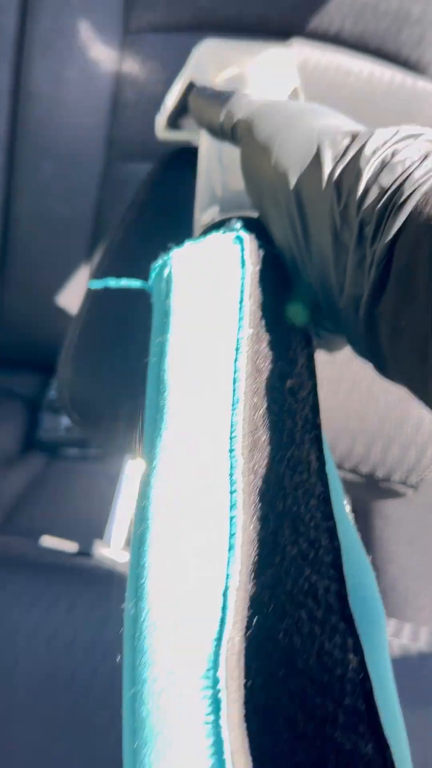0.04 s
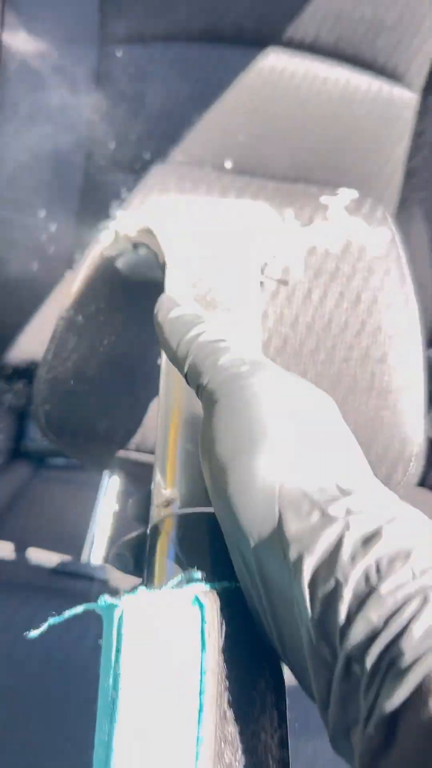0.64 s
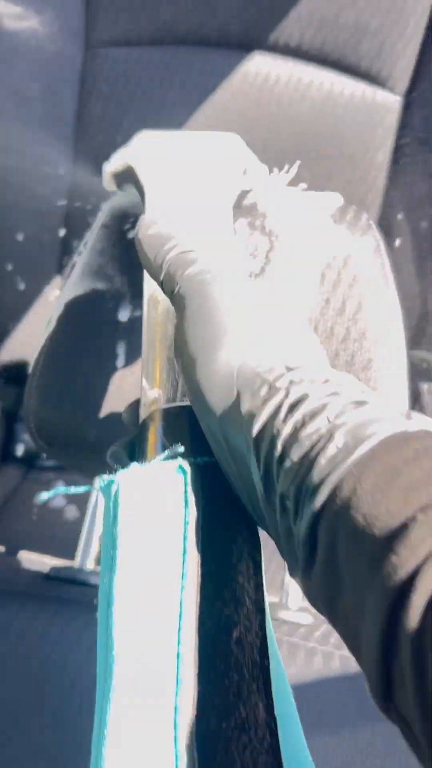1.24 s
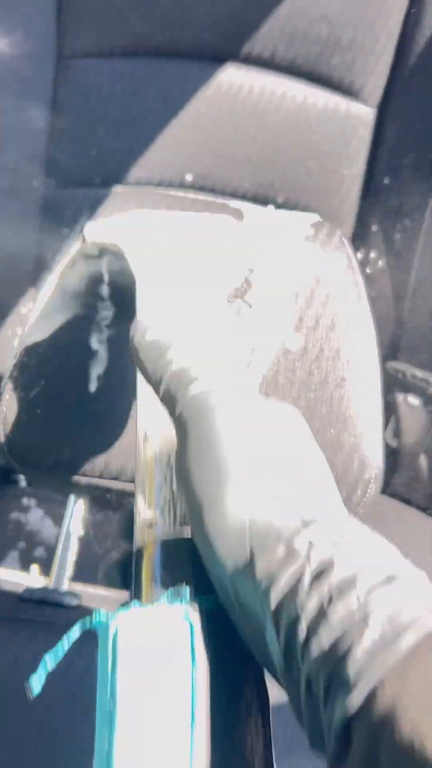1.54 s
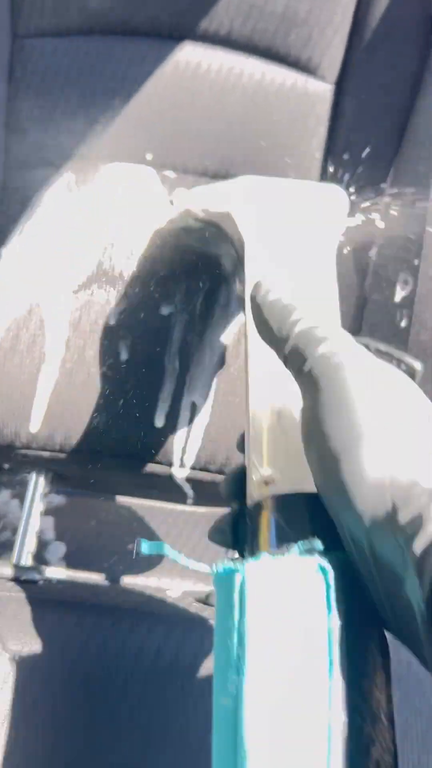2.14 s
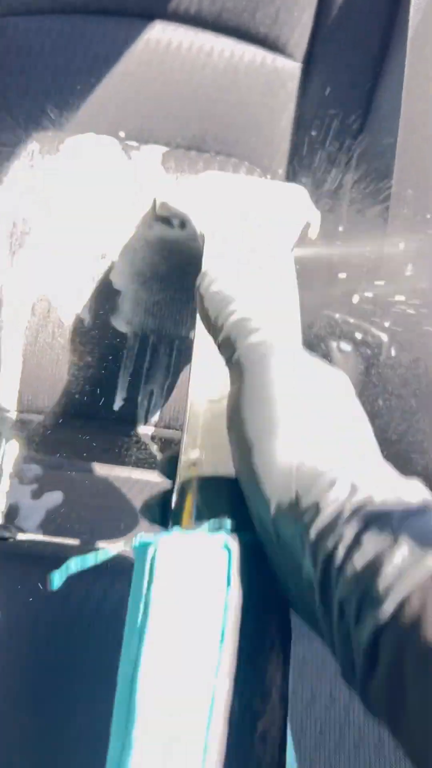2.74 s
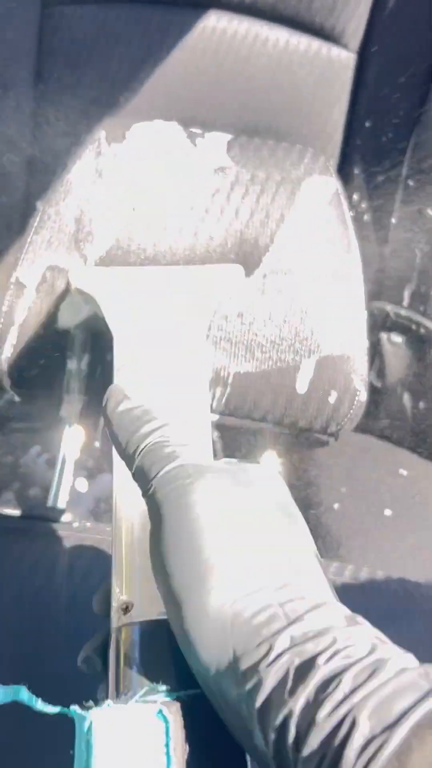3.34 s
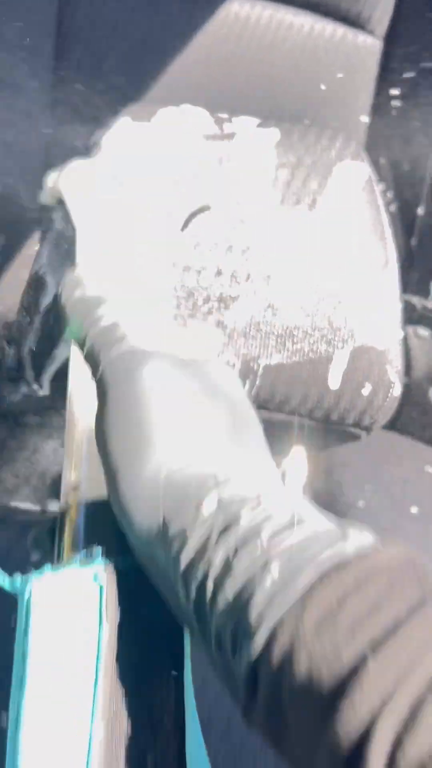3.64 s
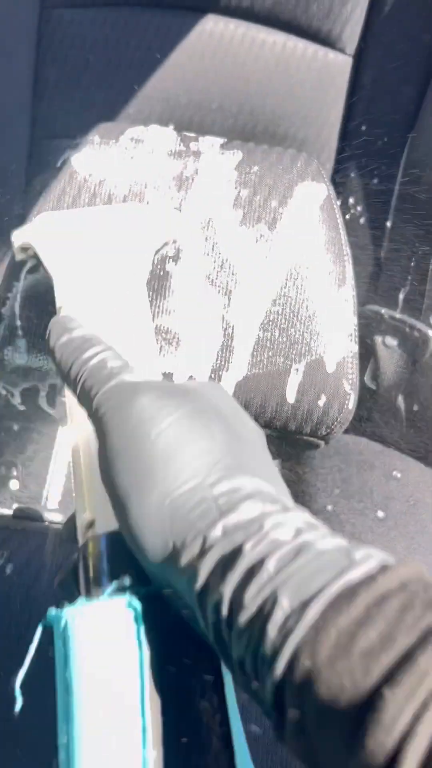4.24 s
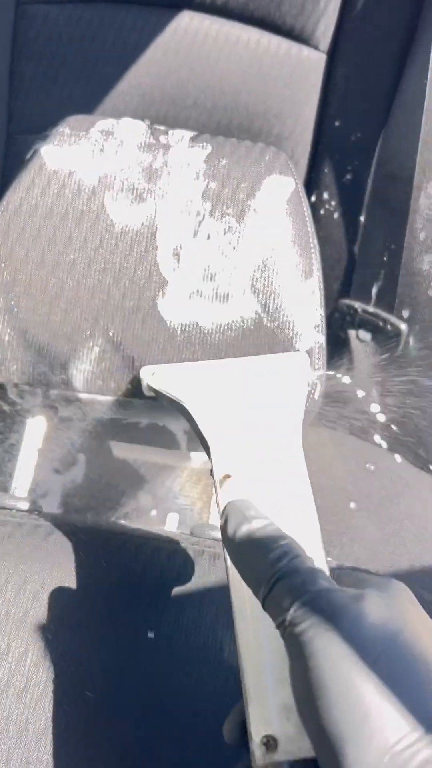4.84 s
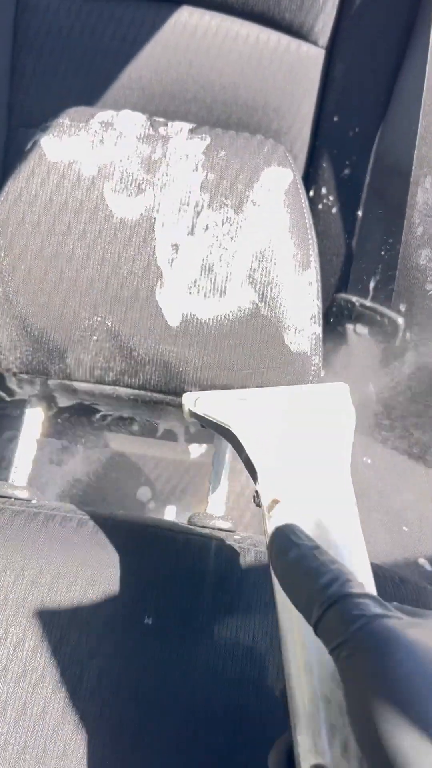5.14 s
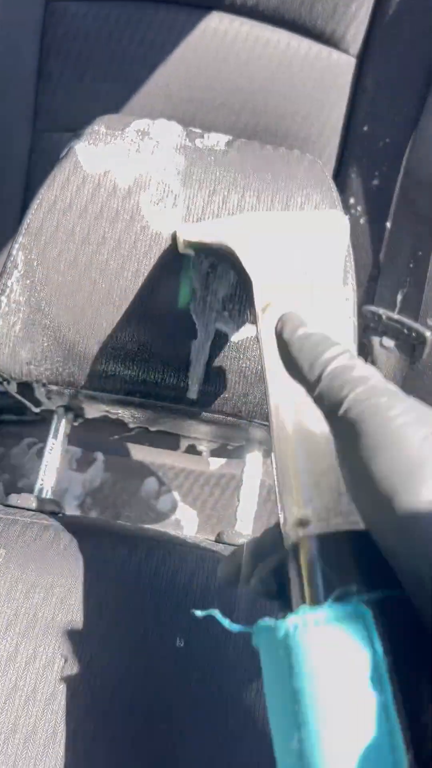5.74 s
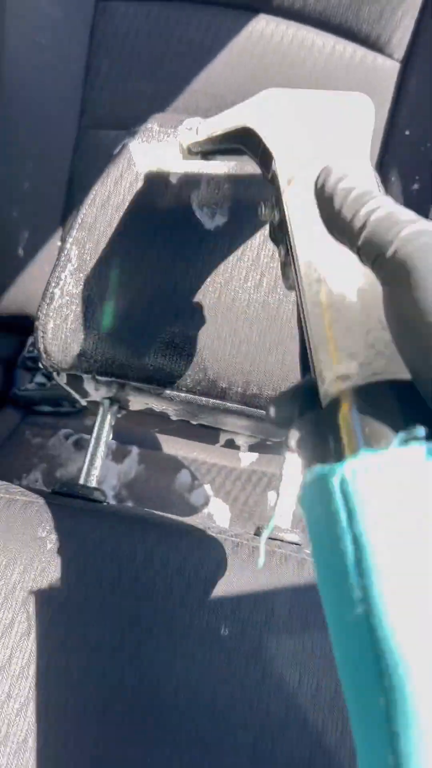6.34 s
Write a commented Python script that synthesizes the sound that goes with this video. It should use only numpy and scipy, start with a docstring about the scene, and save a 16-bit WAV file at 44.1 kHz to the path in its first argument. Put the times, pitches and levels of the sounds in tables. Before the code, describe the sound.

Close, uneven bursts of spray and suction hiss from a cleaning nozzle on wet seat fabric, over a low humming motor.

```python
"""An upholstery extractor is worked over a car seat, close by. From the start its motor hums behind
at harmonics of the shaft speed. The hand tool sprays in mostly short strokes: turbulent air hisses at
the lip, resonates in the hollow head and slurps foam from the cloth, while water spits and bumps ring
the plastic wand. Late on, the nozzle is pressed down for two long strokes, each ending in a soft thud
as it leaves the cushion."""
import sys
import numpy as np
from scipy import signal
from scipy.io import wavfile
from scipy.ndimage import uniform_filter1d

SR = 44100
rng = np.random.default_rng(int(sys.argv[2]) if len(sys.argv) > 2 else 0)


def output_pcm(signal):
    """Save a mono or channel-first signal as 16-bit PCM at the path in sys.argv[1].

    Samples are clipped to [-1, 1] before scaling.
    """
    pcm = np.clip(np.atleast_2d(signal).T, -1, 1) * 32767
    wavfile.write(sys.argv[1], SR, np.round(pcm).astype(np.int16))


N = 290619
SIZE, HOP = 1024, 256  # short-time spectrum, in samples
TIME = np.arange(N) / SR
BINS = np.fft.rfftfreq(SIZE, 1 / SR)[:, None]
FRAMES = np.arange(-(-N // HOP) + 1) * HOP / SR

# rotation of the motor shaft: t/s, f/Hz
SHAFT_SPEED = [(0.0, 28.8), (0.68, 29.3), (1.93, 29.1), (2.57, 28), (3.14, 28.8), (4.46, 28), (6.59, 29.4)]
# harmonics of the hum: multiple of the shaft speed, relative level/dB
SHAFT_ORDERS = [(2, 0), (3, -16), (4, -16), (5, -19.5), (6, -36), (7, -28), (8, -25.5), (9, -22),
                (10, -18.5), (11, -28.5), (12, -25)]
# faint tone that wanders with the load, probably the suction turbine: t/s, f/Hz
TURBINE_PITCH = [(0, 306), (1, 306), (1.5, 313), (2, 310), (2.5, 317), (3, 303), (3.7, 316.5), (4.3, 313),
                 (5, 310.6), (5.7, 303), (6.2, 312), (6.59, 304)]
# blows of the tool on the seat: t/s, relative level/dB, amplitude factor of the thud
SEAT_BLOWS = [(.47, -25, .1), (.668, -37, 3.6), (1.31, -25, .1), (2.455, -20.5, .1), (2.682, -28, .1),
              (3.047, -24.5, .1), (3.346, -24, .1), (4.016, -30, .1), (5.323, -17.5, 0.093),
              (5.519, -20, 2.03), (5.589, -19, .2), (6.463, -32.5, 3.6)]
# modes of the plastic wand: f/Hz, relative level/dB, T60/s
WAND_MODES = [(196, -3.5, 0.072), (261.5, -0.5, 0.081), (306, -11, 0.035), (482, -8.5, 0.038),
              (720, -5, 0.037)]
# spits of water: t/s, relative level/dB, duration/s
WATER_SPITS = [(0.911, -31, 0.012), (0.96, -28, .013), (0.985, -28, .01), (1.525, -34, 0.032),
               (1.834, -29, 0.017), (2.31, -33, .022), (3.22, -30, 0.048), (3.567, -29, .035),
               (3.608, -30, 0.02), (3.656, -29, 0.022), (5.966, -28.5, 0.082), (6.454, -29, 0.019)]
# spectral densities of the five noises: f/Hz, relative level/dB
RUMBLE_SPECTRUM = [(24, -30), (42, -5), (90, 4.5), (140, -9), (200, -2), (290, -3.5), (420, -8.5),
                   (700, -16), (1300, -22), (3000, -18.5), (9000, -30), (16000, -28.5)]
JET_SPECTRUM = [(1200, -23), (2900, -2.5), (3700, -1), (4200, 0.5), (7000, 0), (8500, 0), (11000, -0.5),
                (12400, -9), (16000, -12)]
MIST_SPECTRUM = [(1500, -24), (3500, -7.5), (7000, -1), (9500, -3), (11000, 4), (12600, 0.5), (14000, 2),
                 (16000, 1)]
HEAD_SPECTRUM = [(600, -41), (1050, -6.5), (1350, -6.5), (1580, -1), (2000, -1), (2400, 0.5), (2850, 0.5),
                 (3250, 1), (4500, -10.5), (8000, -51)]
SLURP_SPECTRUM = [(100, -18), (200, -1), (330, -2), (430, -4), (560, 1.5), (740, 0), (900, 0), (1300, 2),
                  (2000, -10.5), (4000, -19)]
# stereo field: f/Hz, coherence in phase, coherence with left a quarter cycle ahead, left minus right/dB
STEREO_FIELD = [(60, 1, 0, 0), (200, .98, -.08, 1.2), (300, .95, .05, 2.6), (450, .38, -.6, 0),
                (690, .8, -.3, -5), (880, -.15, -.1, -8.5), (1150, .05, .72, -3.5), (1500, .85, .22, 1.5),
                (2100, .97, .05, -.6), (2850, 0, .1, 0), (3950, .65, .1, 0), (5000, .25, -.15, 1),
                (6000, .28, -.75, .4), (11000, .2, -.76, 0), (15500, -.07, -.75, 0)]
# nozzle slot on the cloth: t/s, lowest mode f/Hz, tightness of the seal (0-1)
SLOT_SEAL = [(0, 2170, 0.9), (.44, 2130, 0.3), (.52, 1710, 0), (1.9, 1960, 0), (2.87, 2153, 0.4),
             (2.97, 2560, 0.8), (3.1, 2180, .1), (4.35, 2278, 0.24), (4.5, 2000, 0.9), (4.66, 2380, 0.7),
             (4.8, 1930, 1.0), (4.97, 1964, 1.0), (5.21, 2100, 0.9), (5.3, 2946, 1), (5.42, 2145, .6),
             (5.8, 2700, 0), (6.0, 1922, 1.0), (6.45, 1950, 0.8)]
# resonance of the air pocket in the foam: t/s, f/Hz
FOAM_POCKET = [(1.3, 780), (2.2, 885), (2.55, 684), (3.6, 586), (4.9, 646), (6.3, 639)]
# steady draw of air through the hollow head: t/s, level/dB
HEAD_DRAW = [(0, -38.5), (1.0, -34), (2.2, -34), (2.6, -31.5), (3.0, -33.5), (3.04, -29), (3.16, -34),
             (3.85, -29.5), (4.35, -32), (4.65, -28.5), (5.15, -32), (5.35, -35), (6.3, -32.5)]
# strokes of the lip: t/s, duration/s, jet level/dB, mist level/dB, foam level/dB, swell/dB, jet f/Hz
LIP_STROKES = [(0.0, 0.43, -24, -36, -48, 11, 5400), (.44, 0.061, -33, -42, -37.5, 0, 5400),
               (0.682, .06, -35.5, -45, -55, 0, 5600), (0.817, 0.15, -27, -42, -40.5, -3, 5300),
               (1.22, .13, -28.5, -42, -39, -2, 5340), (1.61, 0.082, -33, -41, -45.5, -4, 5800),
               (1.956, 0.11, -21, -31, -37.5, 1, 5700), (2.143, 0.077, -21.5, -38, -33, -2.5, 5800),
               (2.228, .06, -29, -45, -37, 0, 5500), (2.298, 0.13, -23, -44, -41, -1, 5100),
               (2.454, .18, -24, -31.5, -34, -4.5, 6600), (2.656, .23, -29, -40, -38.5, -1, 5730),
               (3.023, 0.087, -28, -32, -44.5, -4.5, 6700), (3.378, .055, -27, -30.5, -45, -4, 6500),
               (3.518, .18, -29.5, -34, -35, -1, 6000), (3.784, 0.29, -27.5, -37, -36.5, -1, 4630),
               (4.135, 0.094, -25.5, -32, -43.5, -3.5, 6500), (4.405, 0.17, -24, -31, -35, 2.5, 6370),
               (4.59, 0.19, -26.5, -29, -43, 2, 7400), (4.786, 0.27, -21.5, -31, -37.5, 1, 8500),
               (5.072, 0.19, -27, -47, -37.5, 0, 4500), (5.251, .26, -25, -34.5, -39, 2, 4600),
               (5.55, 0.14, -31.5, -37.5, -47.5, -2, 9900), (6.033, 0.081, -22, -35, -36, -3, 6080),
               (6.125, 0.34, -24.5, -34, -40.5, 2, 4900), (6.48, 0.063, -30.5, -37, -56.5, 0, 8000)]
# the tool is lifted clear of the cushion: t/s, duration/s
TOOL_LIFTS = [(5.531, 0.4), (6.475, .3)]


def amp(db):
    """Amplitude ratio of a level in decibels."""
    return 10 ** (np.asarray(db) / 20)


def unit(x):
    """Normalisation to rms 1."""
    return x / np.sqrt(np.mean(x ** 2) + 1e-20)


def follow(rows, t):
    """Linear interpolation of a table's columns at times t."""
    times, *columns = np.transpose(rows)
    return [np.interp(t, times, column) for column in columns]


def colour(rows):
    """Interpolation of a table's columns at every bin, on a logarithmic frequency axis."""
    hz, *columns = np.transpose(rows)
    return [np.interp(np.log(BINS + 1), np.log(hz), column) for column in columns]


def drift(top_hz):
    """Superposition of randomly phased sines: a smooth fluctuation of rms 1 over the frames."""
    rates = top_hz * np.geomspace(1 / 8, 1, num=16)[:, None]
    return unit(np.sin(2 * np.pi * (rates * FRAMES + rng.random(rates.shape))).sum(0))


def wobble(top_hz):
    """Slow random modulation: a drift interpolated to every sample."""
    return np.interp(TIME, FRAMES, drift(top_hz))


def peak(centre_hz, octaves):
    """Gaussian spectral peak of height 1 in logarithmic frequency."""
    return np.exp(-(np.log2((BINS + 1) / centre_hz) / octaves) ** 2 / 2)


def add(mix, start, sound):
    """Superposition of a sound on the mix from a start time in seconds."""
    part = mix[..., max(round(start * SR), 0):][..., :sound.shape[-1]]
    part += sound[..., :part.shape[-1]]


def turbulence(drops_per_s, drop_share):
    """Two independent white noises, with a share of their power in the shot noise of bursting droplets."""
    air = rng.standard_normal((2, N))
    sizes = amp(4 * np.minimum(rng.exponential(1, (2, N)), 4))
    drops = rng.choice([-1, 1], (2, N)) * sizes * (rng.random((2, N)) < drops_per_s / SR)
    return np.sqrt(1 - drop_share) * air + np.sqrt(drop_share) * unit(drops)


def radiate(drive, shape_db, level_db, patchy_db):
    """Source and filter: noise takes on a moving, patchy spectrum and a partly coherent stereo field."""
    left, independent = signal.stft(drive, nperseg=SIZE, noverlap=SIZE - HOP)[2]
    patches = uniform_filter1d(rng.standard_normal(left.shape), size=7, axis=0)
    patches = unit(uniform_filter1d(patches, size=14, axis=1))
    shape = amp(shape_db + patchy_db * patches)
    shape = shape / np.sqrt(np.mean(shape ** 2, axis=0)) * amp(level_db)
    in_phase, ahead, side_db = colour(STEREO_FIELD)
    coherence = in_phase - 1j * ahead
    right = coherence * left + np.sqrt(np.maximum(1 - abs(coherence) ** 2, 0)) * independent
    pair = np.array([left * amp(side_db / 2), right * amp(-side_db / 2)])
    return signal.istft(pair * shape, nperseg=SIZE, noverlap=SIZE - HOP)[1][:, :N]


def motor():
    """Rotation radiates harmonics of the shaft speed, beside a turbine tone and a broadband rumble."""
    turns = np.cumsum(follow(SHAFT_SPEED, TIME)[0]) / SR
    hum = np.zeros(N)
    for order, db in SHAFT_ORDERS:
        waver_db = 0.3 if order == 2 else 2.2  # the strongest order is the steadiest
        hum += amp(db + waver_db * wobble(top_hz=7)) * np.sin(2 * np.pi * (order * turns + rng.random()))
    turbine_cycles = np.cumsum(follow(TURBINE_PITCH, TIME)[0]) / SR
    turbine = amp(-51.5 + 2.4 * wobble(top_hz=8.1)) * np.sin(2 * np.pi * turbine_cycles)
    rumble_shape = colour(RUMBLE_SPECTRUM)[0]
    rumble = radiate(turbulence(500, drop_share=0), rumble_shape, level_db=-40.5, patchy_db=1.6)
    return amp(-28) * hum + turbine + rumble


def bumps():
    """Impact excites the wand's damped modes and a thud that falls in pitch as the padding gives."""
    knocks, t = np.zeros(N), np.arange(SR // 4) / SR
    ring = sum(amp(db - 60 * t / t60) * np.sin(2 * np.pi * hz * t) for hz, db, t60 in WAND_MODES)
    thud_hz = 50 + 160 * np.exp(-t / 0.0105)
    thud = np.sin(2 * np.pi * np.cumsum(thud_hz) / SR) * np.exp(-t / 0.034)
    onset = 1 - np.exp(-t / 0.0029)
    for start, db, thud_gain in SEAT_BLOWS:
        add(knocks, start, amp(db) * (ring + thud_gain * thud) * onset)
    return knocks * amp([[0.6], [-0.6]])  # slightly to the left


def spits():
    """Slugs of water burst at the lip, each a short pulse of bright turbulent noise."""
    envelope = np.zeros(N)
    for start, db, length in WATER_SPITS:
        add(envelope, start, amp(db) * signal.windows.tukey(round(length * SR), 0.5))
    spray = turbulence(5300, drop_share=0.3)
    return envelope * radiate(spray, colour(MIST_SPECTRUM)[0], level_db=6.5, patchy_db=2.0)


def seat_echo(depth_db, delay_ms, sway):
    """Interference with a near reflection cuts a comb ripple, in dB, that slides as the hand moves."""
    delay = delay_ms / 1000 * (1 + sway * drift(top_hz=1.5))
    return depth_db * np.cos(2 * np.pi * BINS * delay)


def gesture(start, length, attack_s, release_s):
    """Envelope of one movement, 0-1 at every frame: linear rise, hold and exponential decay."""
    rise = np.clip((FRAMES - start) / attack_s + 0.5, 0, 1)
    return rise * np.exp(-np.maximum(FRAMES - start - length, 0) / release_s)


def flow():
    """Incoherent sources add in power: strokes add to the idle flow, and lifts starve it."""
    # the seal breaks at once; the hiss swells back as the tool nears the seat
    lifted = sum(gesture(*lift, attack_s=0.02, release_s=0.041) for lift in TOOL_LIFTS)
    idle_jet_power = amp(-34 - 9.5 * lifted) ** 2
    jet_power = idle_jet_power.copy()
    mist_power = amp(-37.5 - 4 * lifted) ** 2
    foam_power = amp(-47 - 5.5 * lifted) ** 2
    weighted_hz = jet_power * 5800  # the jet's pitch is a power-weighted mean
    for start, length, jet_db, mist_db, foam_db, swell_db, hz in LIP_STROKES:
        along = np.clip((FRAMES - start) / length, 0, 1)
        arch_db = 1.5 * (np.sin(np.pi * along) - 2 / np.pi)  # the hand presses hardest in mid-stroke
        contact = gesture(start, length, attack_s=0.036, release_s=0.026)
        press = contact * amp(swell_db * (along - 0.5) + arch_db)
        jet_power += (press * amp(jet_db)) ** 2
        mist_power += (press * amp(mist_db)) ** 2
        foam_power += (press * amp(foam_db)) ** 2
        weighted_hz += (press * amp(jet_db)) ** 2 * hz
    jet_db, mist_db, foam_db = 10 * np.log10([jet_power, mist_power, foam_power])
    effort_db = 10 * np.log10(jet_power / idle_jet_power)
    head_db = follow(HEAD_DRAW, FRAMES)[0] + 0.2314 * effort_db - 17.5 * lifted
    return jet_db, mist_db, head_db, foam_db, weighted_hz / jet_power, effort_db


def nozzle():
    """Turbulence filtered by resonances: jet, mist, hollow head and foam flutter with one flow of air."""
    jet_db, mist_db, head_db, foam_db, jet_hz, effort_db = flow()
    slot_hz, seal = follow(SLOT_SEAL, FRAMES)
    pocket_hz, = follow(FOAM_POCKET, FRAMES)
    # sealed on the cloth, the slot rings like a short pipe and shuts out what lies below its lowest mode
    modes = sum(peak(k * slot_hz, octaves=0.097 / k) / np.sqrt(k) for k in range(1, 5))
    ripple = seal * (5.9 * modes - 4 * peak(0.75 * slot_hz, octaves=0.37))
    ripple += seat_echo(depth_db=1.2, delay_ms=1.313, sway=0.143)
    ripple += seat_echo(depth_db=2.8, delay_ms=3.6, sway=0.1004)
    # the focused jet gains at its peak and loses about an octave under it
    focus = 0.34 * effort_db * (peak(jet_hz, octaves=0.37) - peak(0.56 * jet_hz, octaves=0.25))
    jet_shape = colour(JET_SPECTRUM)[0] + focus + ripple
    mist_shape = colour(MIST_SPECTRUM)[0] + 0.82 * ripple  # widely scattered, so less rippled
    brightening = 3 * seal * peak(3500, octaves=0.23)  # faster air through the sealed lip
    head_shape = colour(HEAD_SPECTRUM)[0] + 3 * peak(slot_hz, octaves=0.31)
    head_shape += brightening + 0.5 * focus + ripple
    slurp_shape = colour(SLURP_SPECTRUM)[0] + 4 * peak(pocket_hz, octaves=0.26)
    jet = radiate(turbulence(5000, drop_share=0.31), jet_shape, jet_db + 1.36, patchy_db=2.0)
    mist = radiate(turbulence(3500, drop_share=0.4), mist_shape, mist_db + 6.5, patchy_db=2.0)
    head = radiate(turbulence(1500, drop_share=0.17), head_shape, head_db + 1, patchy_db=2.5)
    slurp = radiate(turbulence(400, drop_share=0.4), slurp_shape, foam_db + 2.5, patchy_db=3.0)
    slow_flutter_db = 0.83 * wobble(top_hz=20)
    fast_flutter_db = 0.42 * unit(uniform_filter1d(rng.standard_normal(N), size=160))
    return (jet + mist + head + slurp) * amp(slow_flutter_db + fast_flutter_db)


def scene():
    """Linear superposition of the machine and the hand tool."""
    return motor() + nozzle() + spits() + bumps()


def record(dry):
    """Band limiting: a linear-phase low-pass filter removes the highest treble."""
    low_pass = signal.firwin(1023, cutoff=15900, window=("kaiser", 9), fs=SR)
    return signal.oaconvolve(dry, low_pass[None], "same")


dry = scene()
out = record(dry)
output_pcm(out)
```